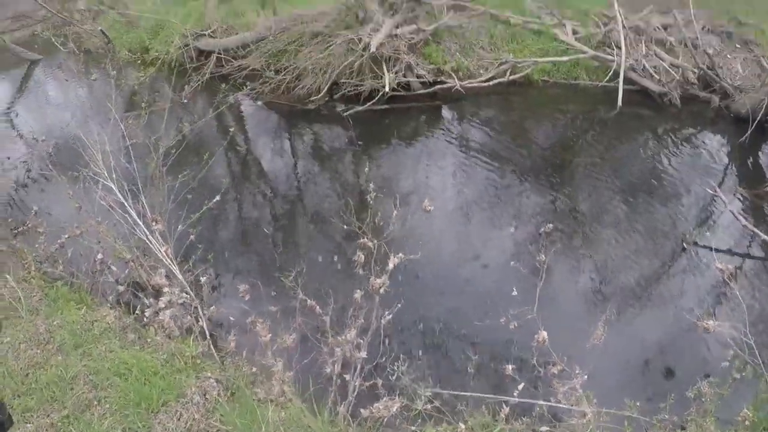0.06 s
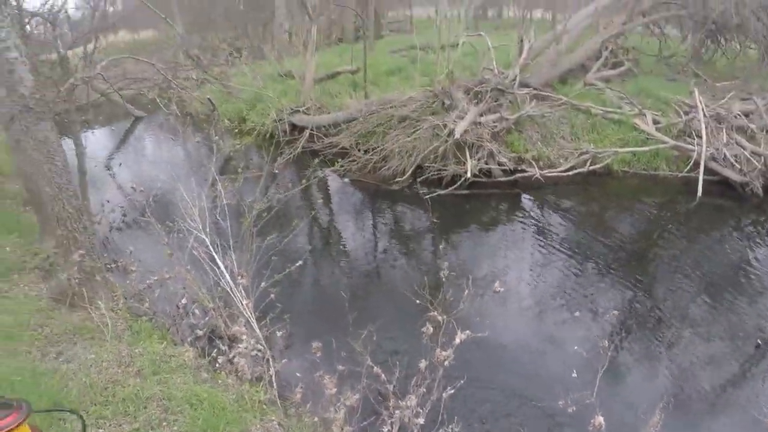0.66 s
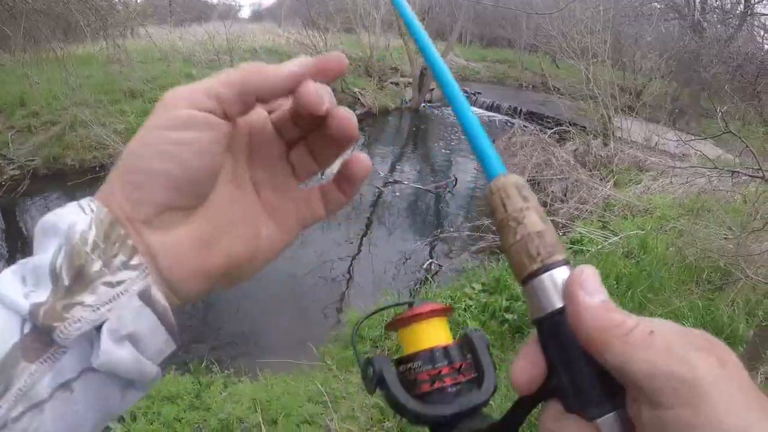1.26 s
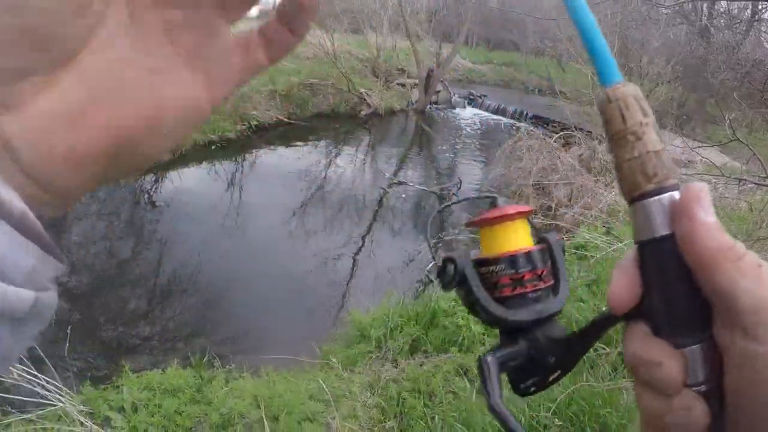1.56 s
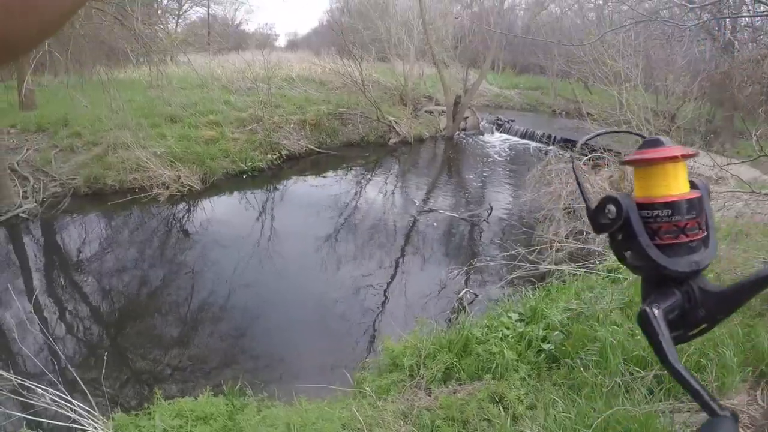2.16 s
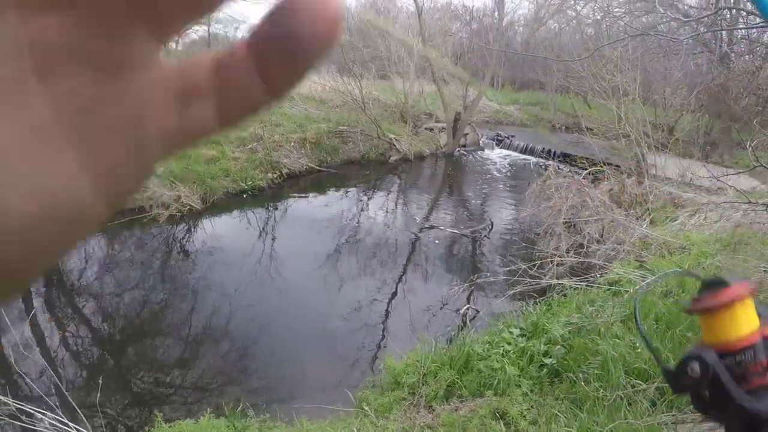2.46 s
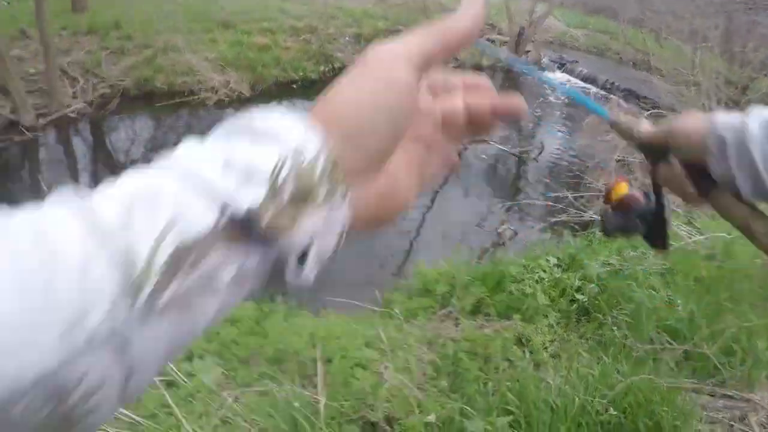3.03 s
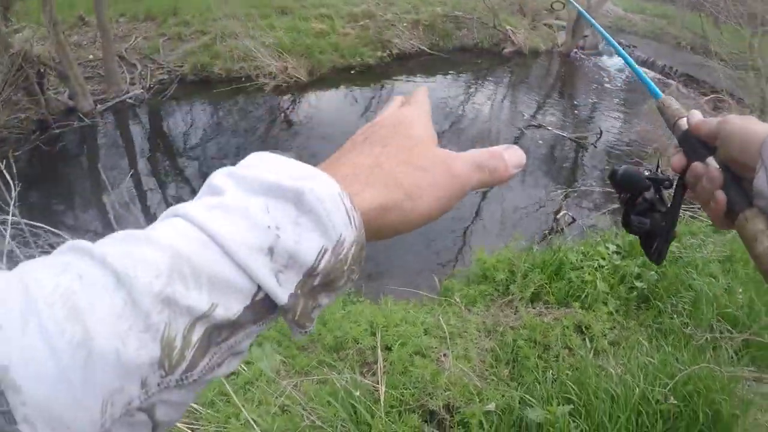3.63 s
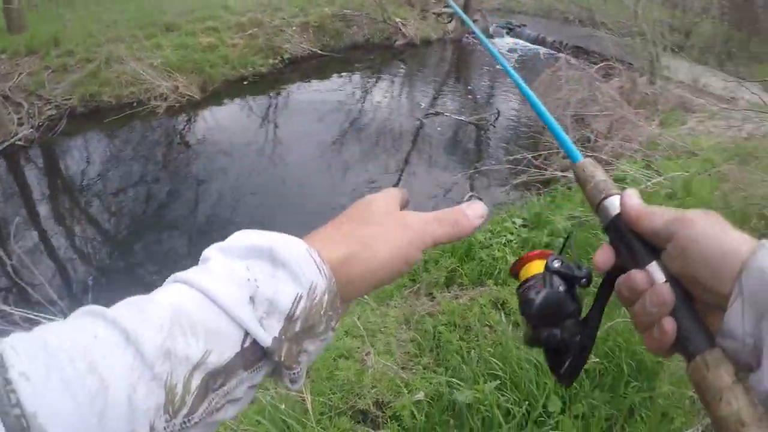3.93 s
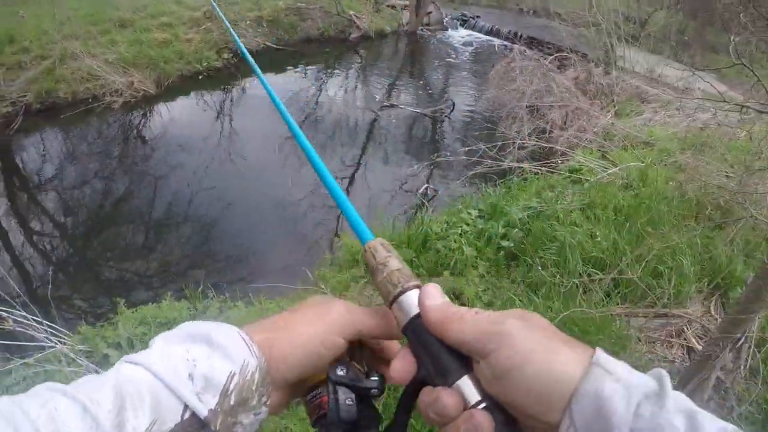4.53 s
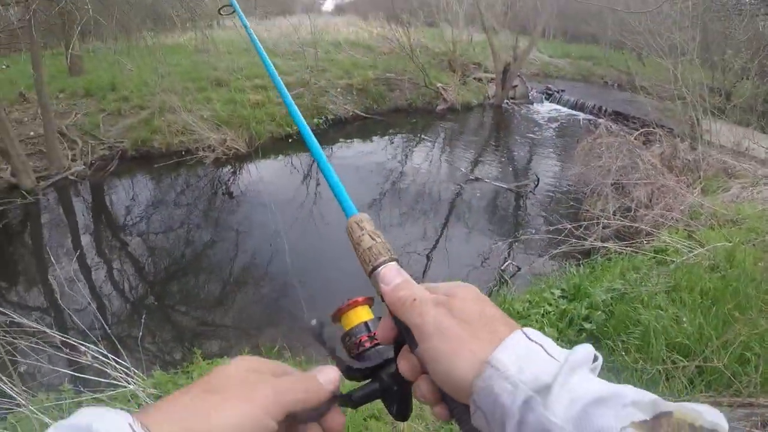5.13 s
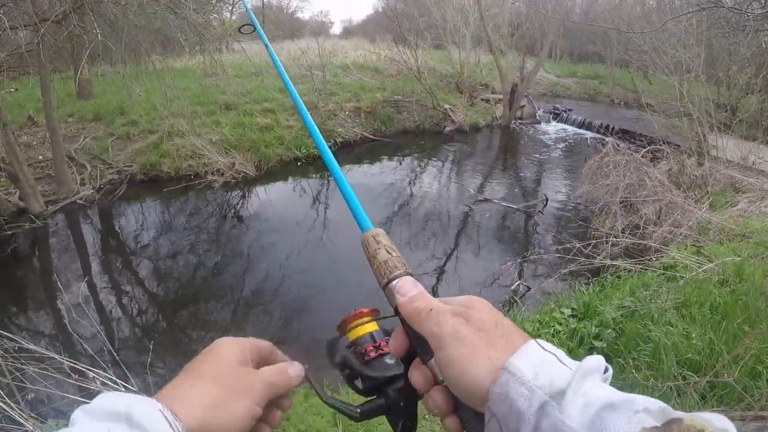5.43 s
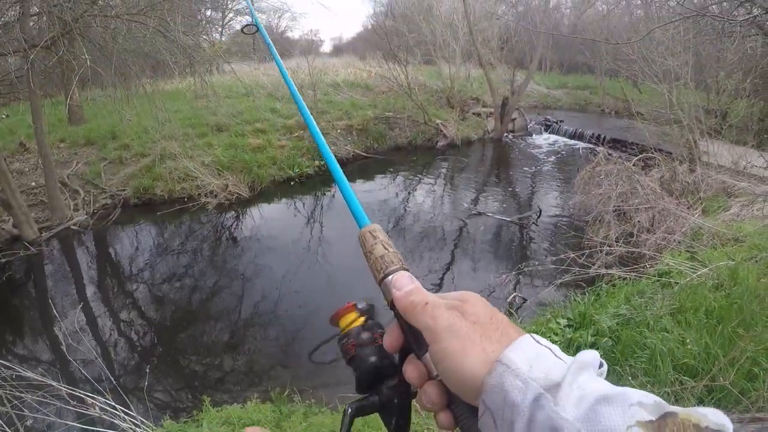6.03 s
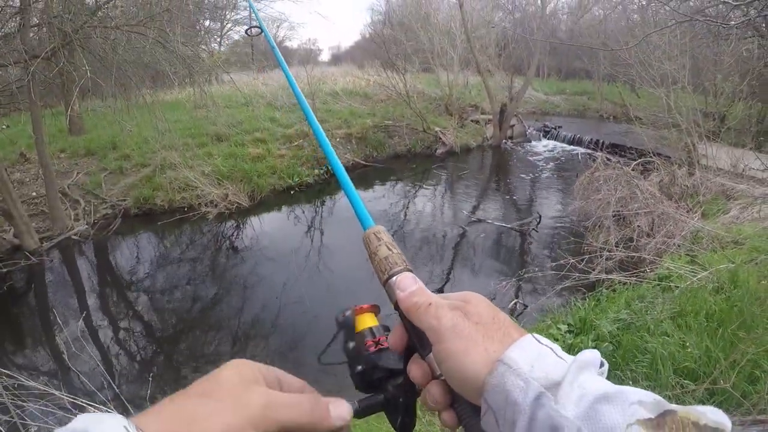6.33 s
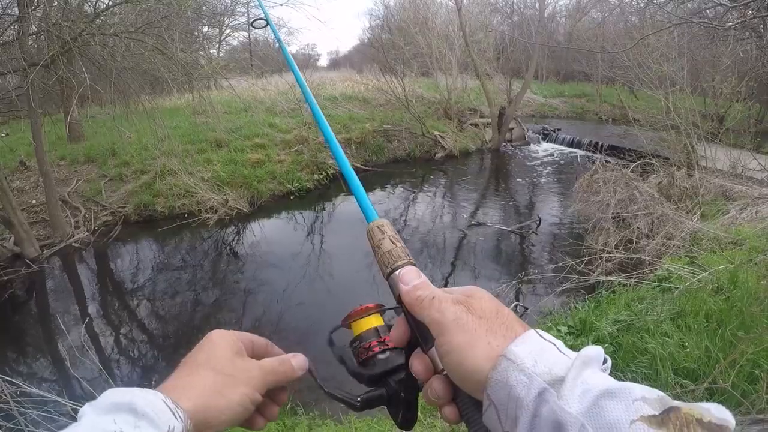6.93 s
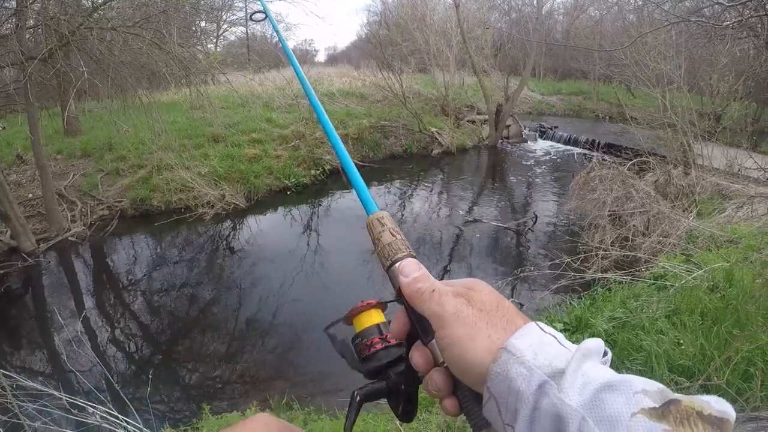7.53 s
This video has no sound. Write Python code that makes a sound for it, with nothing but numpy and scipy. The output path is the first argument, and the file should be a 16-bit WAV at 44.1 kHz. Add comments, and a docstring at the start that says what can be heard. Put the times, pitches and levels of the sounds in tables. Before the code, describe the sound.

After a short wind rumble, creek water spills over a weir, with an arm swing's thump and a reel's sharp click.

```python
"""Angler at a creek weir.

On the bank, wind buffets the microphone and dry grass crackles underfoot, the creek far off.
This stops abruptly and a small weir rushes across the pool, its bubbles and spray coloured by
reflections from the angler's moving arms and chest. Close by, a sleeve brushes past, an arm swing
thumps the air, the reel ticks and its bail snaps shut."""
import sys
import numpy as np
from scipy import signal
from scipy.fft import rfft, irfft
from scipy.io import wavfile
from scipy.ndimage import uniform_filter1d

SR = 44100
rng = np.random.default_rng(int(sys.argv[2]) if len(sys.argv) > 2 else 0)


def log_audio(samples):
    """Write samples as a 16-bit WAV file to the path given in sys.argv[1]."""
    # one column per channel
    frames = np.atleast_2d(samples).T
    # limit to full scale, then quantise
    limited = np.clip(frames, -1, 1)
    pcm = np.round(limited * 32767).astype(np.int16)
    wavfile.write(sys.argv[1], SR, pcm)


N = 343098
T = np.arange(N) / SR
POOL_START_S = 0.944


def undb(db):
    """Decibels to gain."""
    return 10 ** (np.asarray(db) / 20)


def unit(x):
    """Scale to rms 1."""
    return x / np.sqrt(np.mean(x ** 2))


def curves(rows, at):
    """The columns of a table, joined by straight lines in time."""
    times, *columns = np.transpose(rows)
    return [np.interp(at, times, column) for column in columns]


def colour(x, spectrum):
    """Filter x through (freq_hz, gain_db) points and scale to rms 1."""
    hz, db = np.transpose(spectrum)
    f = np.maximum(np.fft.rfftfreq(N, 1 / SR), 1)
    gain = undb(np.interp(np.log(f), np.log(hz), db)) * np.minimum(f / hz[0], 1)
    return unit(irfft(rfft(x) * gain, N))


def noise(spectrum):
    """Coloured noise at rms 1."""
    return colour(rng.standard_normal(N), spectrum)


def steady(x, window_s):
    """Even out a rumble's own swells, so that an envelope can set them."""
    return x / np.sqrt(uniform_filter1d(x ** 2, int(window_s * SR)) + 1e-9)


def fade(t, t60):
    """Decay by 60 dB in t60."""
    return np.exp(-np.log(1000) * t / t60)


def swell(peak_s, rise_s, hold_s, fall_s, at=T):
    """Rise to 1 at peak_s, hold, and fall; rise_s and fall_s are the times for 20 dB."""
    return undb(-20 * (np.maximum(peak_s - at, 0) / rise_s + np.maximum(at - peak_s - hold_s, 0) / fall_s))


def swells(rows):
    """The joint strength of several swells, summed in power."""
    return np.sqrt(sum((undb(db) * swell(s, *shape)) ** 2 for s, db, *shape in rows))


def notch(f, centre_hz, width_hz):
    """The shape of a cancelled band, which comes to a sharp point."""
    return np.exp(-np.abs(f - centre_hz) / width_hz)


def add(out, start_s, sound):
    """Mix a short sound in at start_s."""
    i = int(start_s * SR)
    out[i:i + len(sound)] += sound[:N - i]


def wind():
    """Pressure swings and shed eddies on the microphone, cut off with a click as the scene switches."""
    # wind spectra: freq_hz, gain_db
    gust_spectrum = [(8, 3), (16, 3.5), (23, 5.5), (35, -12), (55, -15), (100, -30), (200, -45), (500, -74),
                     (2000, -96), (8000, -125)]
    eddy_spectrum = [(25, 4), (68, 6.5), (110, -10), (180, -23), (350, -33.5), (700, -44), (2000, -64),
                     (8000, -100)]
    # gusts, and the eddies shed in one of them: peak_s, level_db, rise_s, hold_s, fall_s
    gusts = [(.03, -15.5, 0.17, 0.18, 0.38), (.42, -11.5, 0.46, 0.14, 0.9), (.72, -15.5, 0.15, 0.02, 0.15),
             (.92, -4.5, 0.055, 0.016, .2)]
    shedding = [(.49, -18.5, 0.19, 0.023, 0.42)]
    buffets = steady(noise(gust_spectrum), window_s=0.084) * swells(gusts)
    eddies = steady(noise(eddy_spectrum), window_s=0.026) * swells(shedding)
    click = np.exp(-np.abs(T - POOL_START_S) / 0.013)
    onset = np.sin(np.pi / 2 * np.minimum(T / 0.02, 1)) ** 2
    return (buffets + eddies) * onset * (1 - click) + undb(-18) * click


def grass():
    """Underfoot, dry stalks brush past each other with a fine crackle, and a few snap brightly."""
    # brushing and snapping stalks: freq_hz, gain_db
    brush_spectrum = [(800, 4), (1300, 5), (1800, 5.5), (2300, -2), (3000, -4), (3900, 3.5), (5100, -8.5),
                      (6600, -2), (9000, -14), (14000, -27)]
    snap_spectrum = [(800, -17), (1700, -9), (2900, -13), (3900, 9), (5100, -3), (6600, 6), (9000, -2),
                     (14000, -18)]
    # a step pressing the grass: peak_s, level_db, rise_s, hold_s, fall_s
    step = [(.01, -53, 0.025, 0.14, 0.43)]
    # stalks breaking: start_s, level_db
    cracks = [(0.03, -35), (0.051, -31), (0.14, -44), (0.169, -33.5), (0.193, -48), (.208, -40),
              (0.218, -38), (0.23, -42), (0.247, -40), (0.2603, -44), (.311, -49), (0.453, -51)]
    t = T[:SR // 20]
    grains_per_s = 720
    crackle = signal.fftconvolve(rng.random(N) < grains_per_s / SR, fade(t, t60=0.0046))[:N]
    snaps = np.zeros(N)
    for start_s, db in cracks:
        add(snaps, start_s, undb(db) / 2 * fade(t, t60=0.011))
    brushing = noise(brush_spectrum) * unit(0.17 + crackle) * swells(step)
    return brushing + noise(snap_spectrum) * snaps


def bubbles(count, cycles, spread_db, rise):
    """Air pockets ring briefly, rising in pitch as they near the surface; a few are louder."""
    out = np.zeros(N)
    for when, smallness, luck in rng.random((count, 3)):
        hz = 350 * 40 ** smallness
        age = np.arange(int(cycles * SR / hz)) * hz / (cycles * SR)  # 0 to 1 over the bubble's life
        ring = np.sin(2 * np.pi * cycles * age * (1 + rise * age / 2)) * fade(age, 0.76)
        gain = min(hz, 4500) * undb(-spread_db * np.log(max(luck, 0.01)))
        add(out, when * T[-1], ring * gain)
    return unit(out)


def churn(flicker_db):
    """Bubbles over the hiss of spray; each band flickers as the flow breaks up."""
    spray = rng.standard_normal(N)
    water = spray + undb(-8.5) * bubbles(count=8000, cycles=44, spread_db=2.0, rise=0.15)
    _, _, cells = signal.stft(unit(water), SR, nperseg=512)
    flicker = uniform_filter1d(rng.standard_normal(cells.shape), size=14, axis=0)  # across bands
    flicker = uniform_filter1d(flicker, size=9, axis=1)  # across time
    return unit(signal.istft(cells * undb(flicker_db * unit(flicker)), SR)[1][:N])


def creek(water):
    """The sheltered creek, faint and dull with distance."""
    # far-off water: freq_hz, gain_db
    spectrum = [(100, 4.5), (550, -2.5), (850, -5.5), (1500, -15.5), (2300, -18.5), (3800, -24.5),
                (5000, -32.5), (6400, -28.5), (9000, -34), (15000, -42.5)]
    return undb(-50.5) * colour(water, spectrum)


def weir(water):
    """Falling water across the pool; nearby reflections cut notches that slide as the angler moves."""
    # falling water: freq_hz, gain_db
    spectrum = [(100, -4.5), (220, -7), (470, -2), (780, 0.5), (1100, -2.87), (1500, -4), (2300, -7),
                (2900, -11), (4200, -14), (5200, -24), (6700, -22.5), (8200, -27.5), (10500, -37.5),
                (15000, -45)]
    # the weir as the angler turns: time_s, level_db, treble_lift_db
    flow = [(.94, -41.5, 1.5), (2.1, -41, 0), (2.55, -44, 3.4), (3.0, -37.5, -3), (3.4, -40.5, 0.5),
            (4.3, -42, 1.5), (6.1, -43.5, 1.3), (7.78, -43.5, 2.5)]
    # echo off chest and arms, lower when its path is longer: time_s, pitch_ratio, strength
    echo = [(.94, 0.97, 0.99), (2.0, 0.78, 0.72), (2.75, 1.01, .85), (3.1, 1.09, 0.76), (3.7, 1.04, 0.8),
            (4.3, 1.11, 1), (4.65, 1.055, 0.74), (5.2, 0.98, 0.7), (7.78, 1.008, 0.73)]
    # bands the echo cancels or, at negative depth, reinforces:
    # centre_hz, share_of_pitch_shift, width_hz, depth_db, share_lost_behind_arm
    bands = [(1098, 1, 374, 11, 0), (1737, 0.81, 445, 14.5, 0), (2660, 0.64, 140, -2, 0),
             (3465, 0.69, 303, 17, 0.44), (5750, 0.14, 133, 13, 0.4), (9400, 0.57, 500, 1, 0)]
    f, t, cells = signal.stft(colour(water, spectrum), SR, nperseg=1024)
    f = f[:, None]
    level_db, treble_db = curves(flow, t)
    ratio, strength = curves(echo, t)
    db = level_db + treble_db * f ** 2 / (f ** 2 + 1500 ** 2)
    screened = swell(2.74, rise_s=0.31, hold_s=2, fall_s=0.5, at=t)  # arm in front of the chest
    for centre_hz, follows, width_hz, depth_db, lost in bands:
        cut_db = strength * (1 - lost * screened) * depth_db
        db -= cut_db * notch(f, centre_hz * ratio ** follows, width_hz)
    # the outstretched arm cancels one more band, which slides down as the arm is lowered
    reach_s, arm_hz, slide_hz_per_s, arm_depth_db = 2.95, 5220, 1700, 11
    reach = swell(reach_s, rise_s=0.25, hold_s=0.47, fall_s=0.65, at=t)
    db -= reach * arm_depth_db * notch(f, arm_hz - slide_hz_per_s * (t - reach_s), width_hz=400)
    return signal.istft(cells * undb(db), SR)[1][:N]


def draught():
    """Arms and body push air at the microphone, over a faint breeze."""
    # moving air: freq_hz, gain_db
    spectrum = [(3, 24.5), (10, 6.5), (22, 3.5), (45, -1.5), (90, -17.5), (200, -59), (1000, -66),
                (8000, -110)]
    # small movements: peak_s, level_db
    moves = [(1.0, -45), (2.55, -41.5), (3.25, -35), (3.75, -39), (4.15, -39.5), (4.72, -42), (5.08, -38.5),
             (5.79, -44), (6.55, -41)]
    # the arm swing's wave of air: peak_s, level_db, rise_s, hold_s, fall_s
    swing = [(2.97, -17.5, 0.14, 0.091, 0.28)]
    rise_s, fall_s, breeze_db = 0.42, 0.59, -47.5
    puffs = swells([(peak_s, db, rise_s, 0, fall_s) for peak_s, db in moves])
    strength = np.hypot(undb(breeze_db), np.hypot(puffs, swells(swing)))
    return steady(noise(spectrum), window_s=0.094) * strength


def sleeve():
    """Cloth rubs past close to the microphone, and its weave swishes brightly."""
    # cloth and weave: freq_hz, gain_db
    rub_spectrum = [(30, -2), (90, 0), (240, -4), (380, -12), (800, -21), (2000, -23.5), (7000, -50),
                    (14000, -70)]
    swish_spectrum = [(1000, -29), (3000, 10), (5600, 5), (8000, -5), (11000, -14), (15000, -23)]
    # passes of the sleeve: peak_s, level_db, rise_s, hold_s, fall_s
    rubs = [(2.35, -46.5, 0.14, 0.26, 0.15), (2.96, -39.5, 0.084, 0.059, .08)]
    swishes = [(2.96, -56, 0.6, .03, 0.37), (4.61, -54, 0.17, 0.061, 0.47)]
    return noise(rub_spectrum) * swells(rubs) + noise(swish_spectrum) * swells(swishes)


def thumps():
    """Soft bumps of arm and rod, each a damped tone with a rounded attack."""
    # bumps: start_s, level_db, pitch_hz, t60_s
    bumps = [(2.964, -23, 41.7, 0.13), (3.041, -40, 25.2, 0.65), (4.372, -34, 504, 0.048),
             (4.375, -33, 675, 0.044)]
    out, t = np.zeros(N), T[:SR // 2]
    attack = 1 - fade(t, t60=0.016)
    for start_s, db, hz, t60 in bumps:
        add(out, start_s, undb(db) * np.sin(2 * np.pi * hz * t) * fade(t, t60) * attack)
    return out


def reel_ticks():
    """Line and gears tick faintly, each a burst of noise through a broad resonance."""
    # ticks: start_s, peak_db, centre_hz
    ticks = [(3.087, -38, 6850), (3.4861, -38.5, 6250), (4.3423, -39, 8150), (4.824, -38, 1400),
             (5.01, -46, 7350)]
    out, t = np.zeros(N), T[:SR // 10]
    for start_s, db, hz in ticks:
        body = signal.iirpeak(hz, Q=2.2, fs=SR)
        burst = rng.standard_normal(len(t)) * fade(t, t60=0.011)
        tick = signal.lfilter(*body, signal.lfilter(*body, burst))
        add(out, start_s, undb(db) * tick / np.abs(tick).max())
    return out


def bail_snap():
    """The bail trips, hits its stop and rattles; each contact scrapes and rings the reel body."""
    # contacts of the bail: start_s, peak_db, treble_lift_db
    contacts = [(4.6986, -26.5, 25), (4.7, -13, -6), (4.7033, -20.5, 9), (4.708, -31, 0), (4.713, -33, -4),
                (4.7182, -29, -8)]
    # modes of the reel: pitch_hz, level_db, t60_s
    modes = [(1696, -3, 0.04), (2010, 2.5, 0.015), (2260, 11, 0.01), (2650, 4, 0.01), (3680, -3, .012),
             (6600, -5, 0.012), (6900, -9, 0.011), (8660, -16, 0.0072), (10100, -25, 0.0084),
             (11850, -22, 0.014)]
    # scraping contact: freq_hz, gain_db
    scrape_spectrum = [(500, -11), (1150, -3), (1900, -5), (4000, -12), (7000, -15), (10000, -18),
                       (15000, -30)]
    out, t = np.zeros(N), T[:SR // 10]
    scrape = noise(scrape_spectrum)
    attack = (1 - fade(t, t60=0.00098)) ** 2
    for start_s, db, treble_db in contacts:
        ring = np.zeros(len(t))
        for hz, mode_db, t60 in modes:
            gain = undb(mode_db + treble_db * (hz > 5000))
            ring += gain * np.sin(2 * np.pi * (hz * t + rng.random() / 4)) * fade(t, t60)
        crack = scrape[int(start_s * SR):][:len(t)] * fade(t, t60=0.024)
        hit = (ring + undb(-6) * crack) * attack
        add(out, start_s, undb(db) * hit / np.abs(hit).max())
    return out


def scene():
    """First the windy bank with the creek far off, then the pool below the weir, in mono."""
    water = churn(flicker_db=0.78)
    bank = wind() + grass() + creek(water)
    pool = weir(water) + draught() + sleeve() + thumps() + bail_snap() + reel_ticks()
    return np.where(T < POOL_START_S, bank, pool)[None]


def record(dry):
    """The camera's microphone channel cuts the top of the treble steeply."""
    top_hz = 15300
    return signal.sosfilt(signal.ellip(10, 0.1, 80, top_hz, fs=SR, output="sos"), dry)


dry = scene()
out = record(dry)
log_audio(out)
```